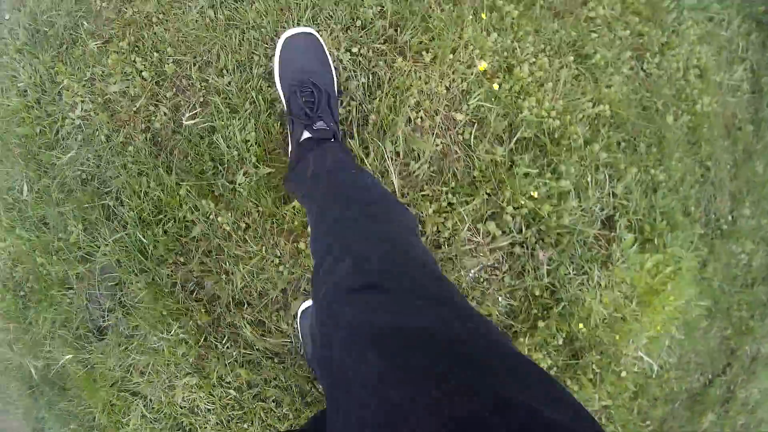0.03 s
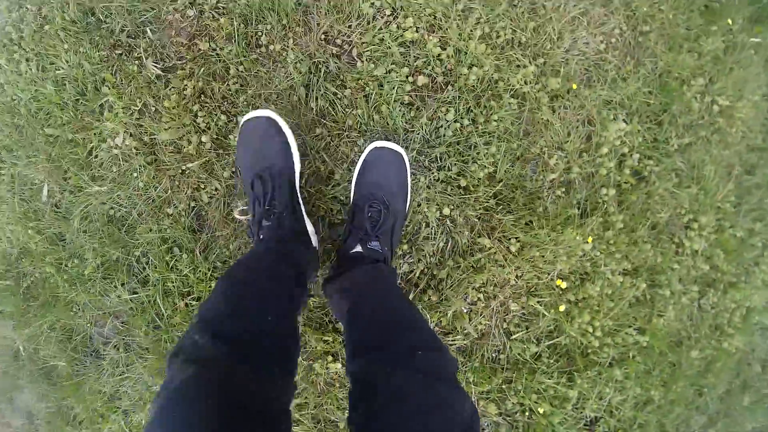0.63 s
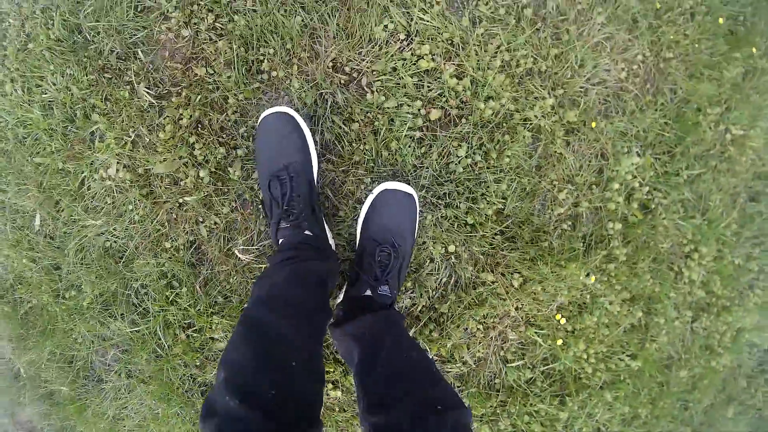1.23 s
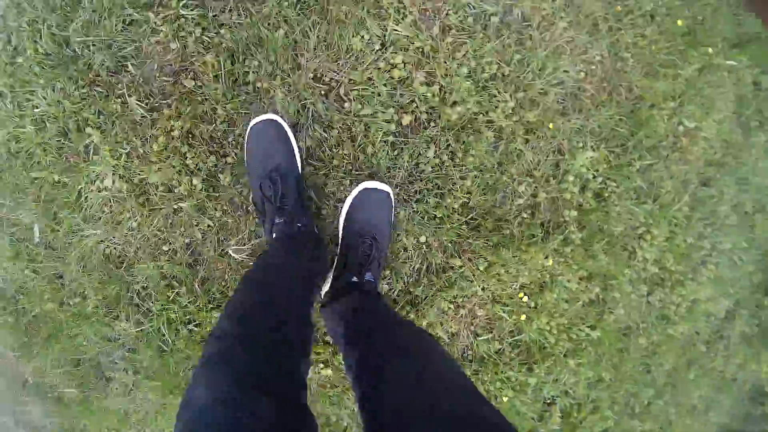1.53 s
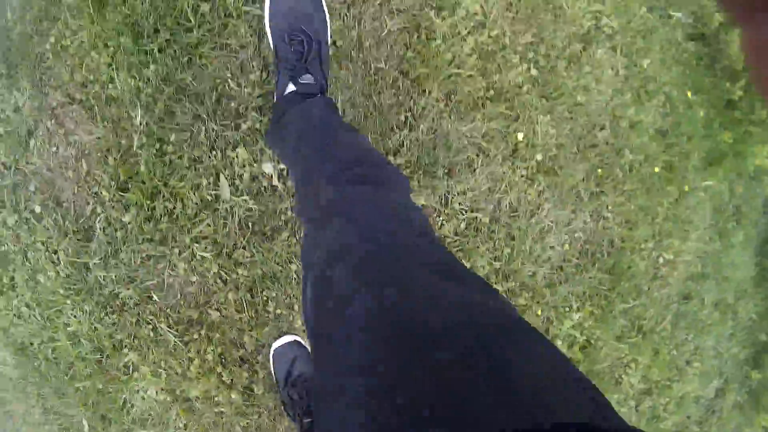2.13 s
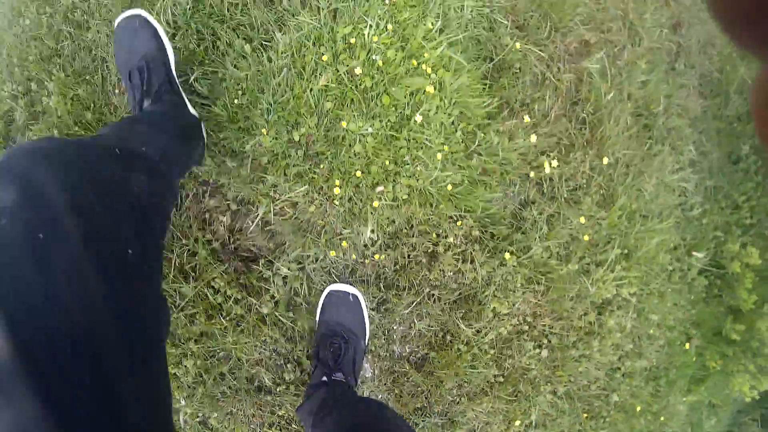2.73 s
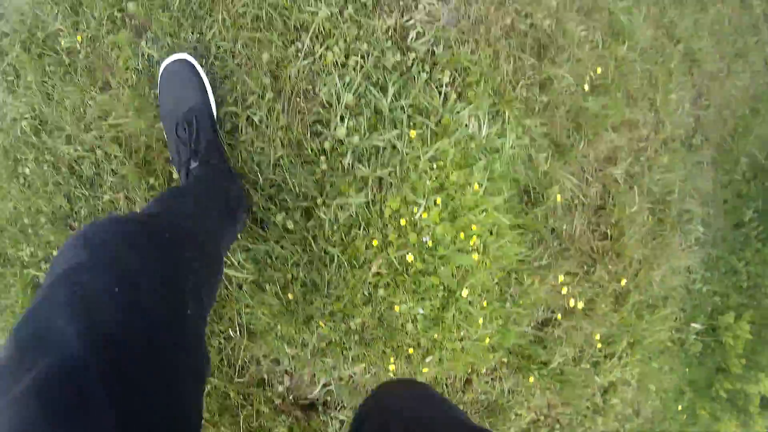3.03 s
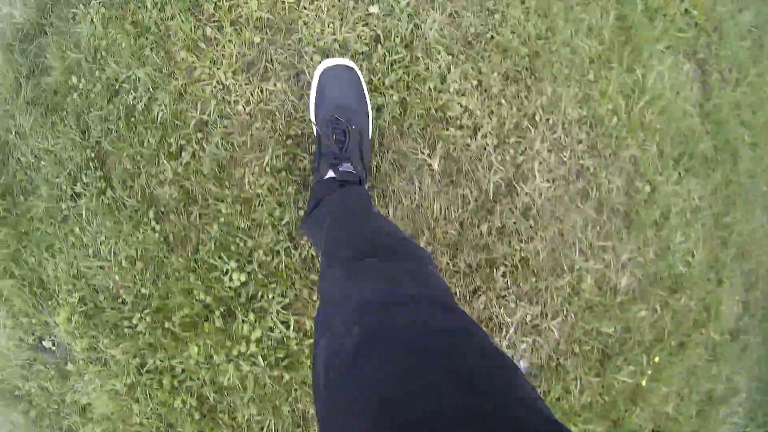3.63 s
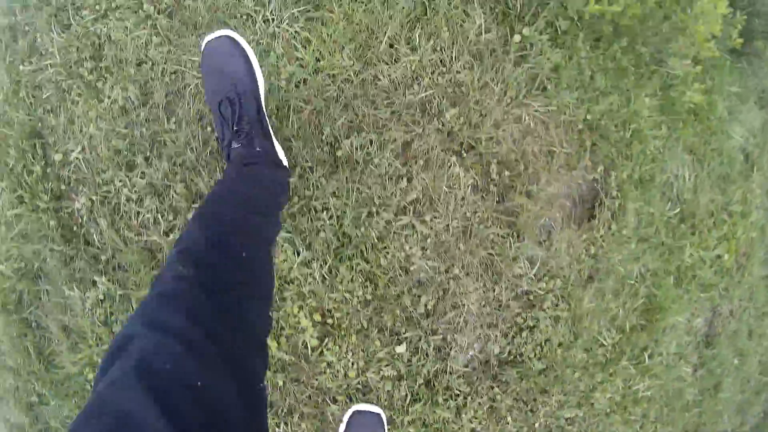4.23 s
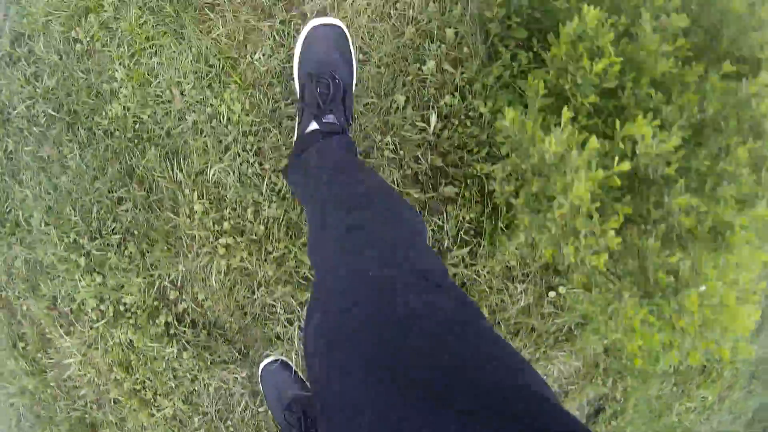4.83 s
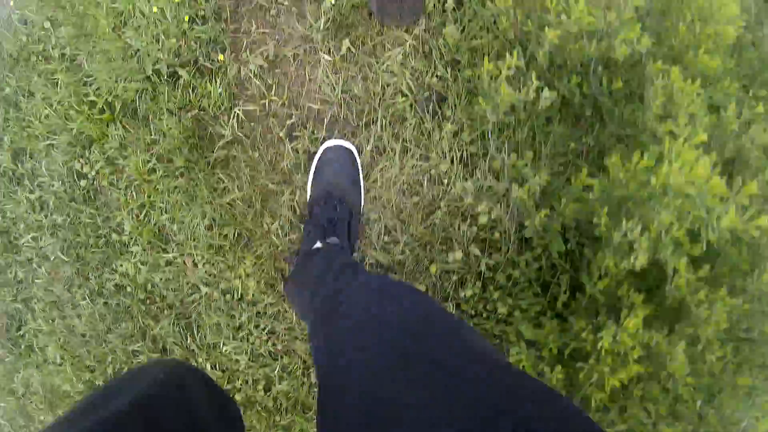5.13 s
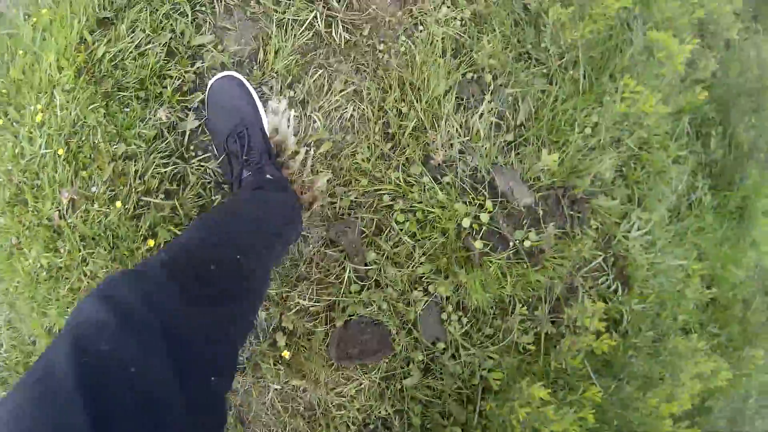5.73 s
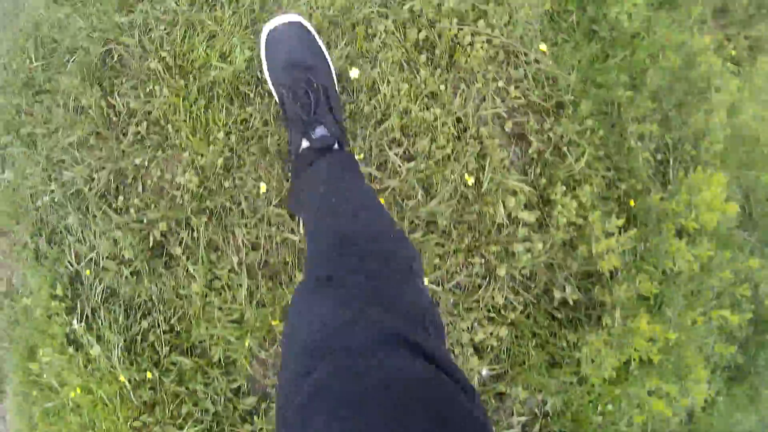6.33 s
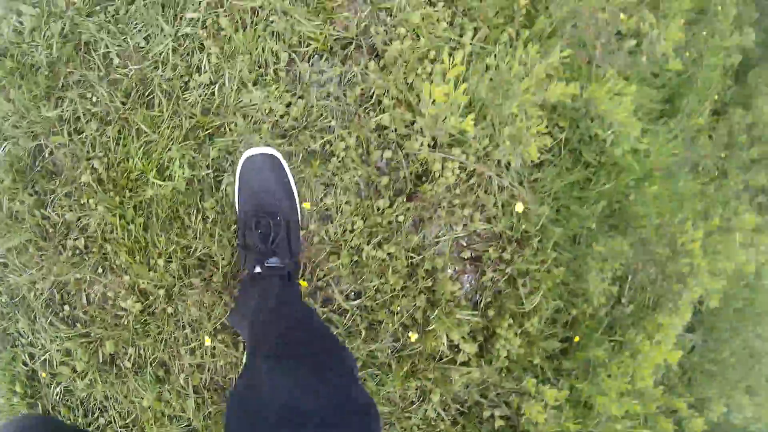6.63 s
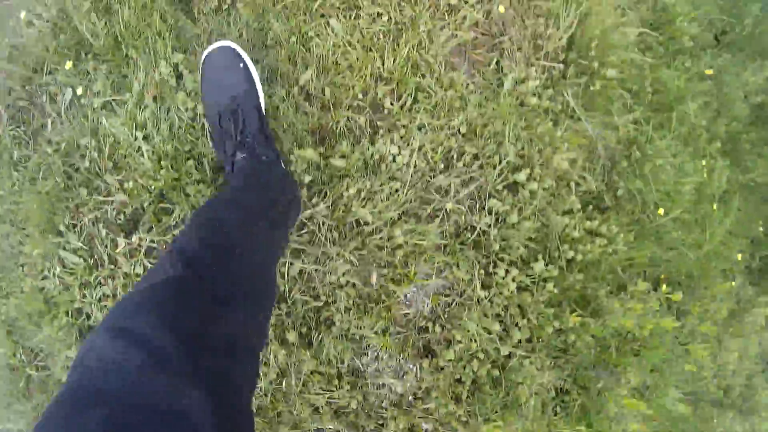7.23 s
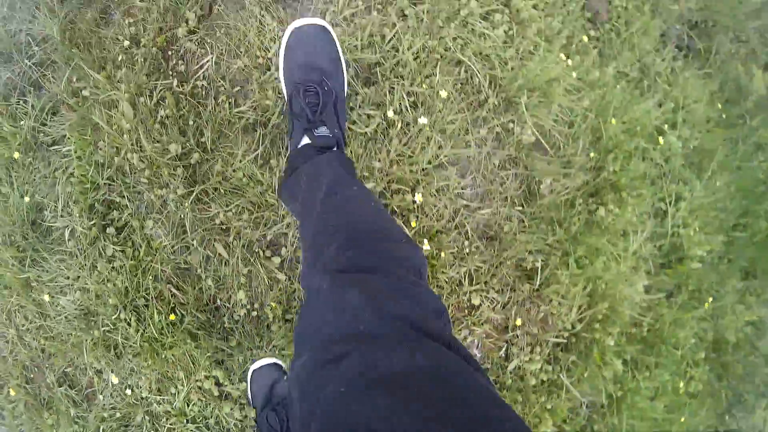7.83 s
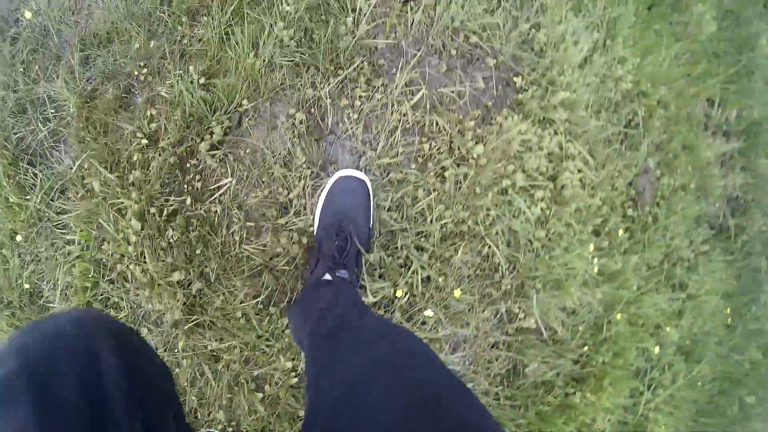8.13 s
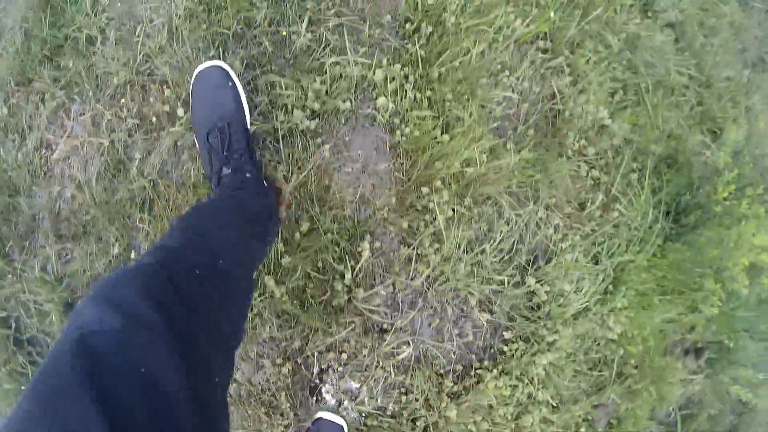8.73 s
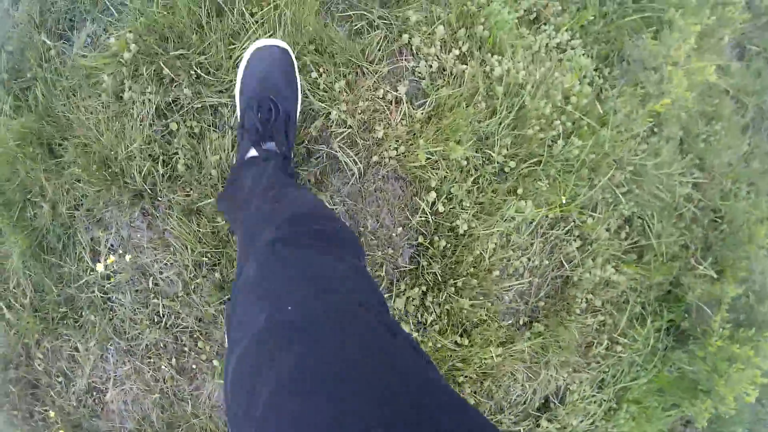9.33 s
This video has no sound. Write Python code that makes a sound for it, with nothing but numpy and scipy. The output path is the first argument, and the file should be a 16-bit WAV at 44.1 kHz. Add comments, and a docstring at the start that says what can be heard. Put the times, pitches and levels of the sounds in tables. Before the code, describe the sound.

Fingers rub and creak on a hand-held camera's casing in close, damp, rubbery bursts, then settle, leaving faint ticks and low outdoor rumble.

```python
"""A walk over damp grass, heard from a small hand-held camera. From the start, a low outdoor rumble and
an electronic hiss that comes once a second lie under a close, damp, rubbery rubbing, most likely fingers
on the casing. For about four seconds they stick and slip in creaks and snaps, slide smoothly in between
and give a few soft thuds. Then the hand settles with one last hollow rub. Once the grip rests, only
faint ticks and soft thuds are left over the rumble and hiss."""
import sys
import numpy as np
from scipy import signal
from scipy.fft import rfft, irfft, next_fast_len
from scipy.io import wavfile

SR = 44100
rng = np.random.default_rng(int(sys.argv[2]) if len(sys.argv) > 2 else 0)


def master(y):
    """Save y as 16-bit WAV."""
    cut = np.clip(np.atleast_2d(y).T, -1, 1)
    pcm = np.round(cut * 32767)  # scale
    wavfile.write(sys.argv[1], SR, pcm.astype(np.int16))


N = 414099
TIME = np.arange(N) / SR
FREQS = np.maximum(np.fft.rfftfreq(2 * next_fast_len(N // 2 + SR // 4), 1 / SR), 1)
SLIP_SAMPLES = SR // 60

# Levels in a table compare its rows; the functions set the final loudness.
# tone of the outdoor rumble and microphone hiss: frequency_hz, level_db
BACKGROUND_TONE = [(12, 0), (22, -2.5), (45, -4), (90, -5.5), (160, -9), (300, -12.5), (600, -18.5),
                   (1200, -23.5), (2500, -26), (8000, -28.5), (14000, -28), (16000, -32.5)]
# soft thuds of the hand and the stride: time_s, level_db, pitch_hz
SOFT_THUDS = [(0.597, -37, 85), (0.596, -36, 203), (1.833, -45, 170.1), (1.833, -30.5, 333),
              (2.252, -45, 139.6), (4.381, -55, 380), (6.129, -53.5, 368), (6.319, -52, 340),
              (6.400, -55, 420), (6.696, -49.5, 380)]
# faint ticks of the casing: time_s, level_db
CASING_TICKS = [(4.72, -53.5), (6.092, -58), (6.319, -67), (6.4, -64), (6.59, -63), (6.696, -61),
                (7.632, -59), (9.196, -52)]
# hollow rubs as the hand settles: peak_s, rise_s, fall_s, level_db
SETTLING_RUBS = [(3.741, 0.04, 0.12, -56), (3.9, 0.028, 0.075, -60), (4.071, 0.15, 0.092, -65.5)]
# how well the casing carries low and high sounds: frequency_hz, gain_db
CASING_TONE = [(30, -12.5), (100, -4.5), (260, -5), (400, -1), (850, -6), (1400, -6.5), (2000, -11),
               (2600, -22), (4500, -25.5), (5300, -38), (8500, -45), (11200, -42.5), (15000, -59.5)]
# narrow bands where the casing rings (+) or sounds hollow (-): frequency_hz, width_hz, gain_db
CASING_RESONANCES = [(399, 100, 2.5), (507, 77, 8), (561, 59, -8.5), (639.7, 54, 6.5), (840, 35, 3),
                     (870, 52, -9), (1000, 32, 3), (1127, 76, 2), (1200, 90, 1), (1568, 190, 4.5),
                     (1885, 92, -8.5), (1963, 190, 6), (2970, 240, 3.5), (3330, 130, 6.5), (3440, 290, -7),
                     (3890, 410, 4), (4450, 400, 1), (5150, 610, 0)]
# tone of smooth sliding, before the casing shapes it: frequency_hz, level_db
SLIDE_TONE = [(60, -1.5), (250, -3.5), (500, -6.5), (750, -10), (1080, 6.5), (1350, -19), (1650, 4.5),
              (2200, -0.5), (3200, 9), (4500, 3.5), (5500, 10), (7000, 10), (11000, 4)]
# smooth slides that swell and die away: peak_s, rise_s, fall_s, level_db, squeal_hz, squeal_db
SMOOTH_SLIDES = [(0.131, 0.02, 0.082, -51.5, 1603, -7), (0.47, 0.13, 0.16, -50.5, 1500, -9),
                 (1.32, 0.1, 0.053, -54, 1250, 7), (1.46, 0.05, 0.21, -47.5, 1145, -8),
                 (1.67, 0.06, 0.15, -53, 1310, 4), (1.82, 0.03, 0.02, -57, 1450, -1),
                 (1.959, 0.07, 0.023, -51, 1660, -9), (2.16, 0.22, 0.22, -62.5, 1525, -27),
                 (2.548, 0.05, 0.04, -41, 1294, 5.5), (2.759, 0.07, 0.16, -39, 1145, -6.5),
                 (2.829, 0.05, 0.069, -43, 1153, -7.5), (3.0, 0.06, 0.044, -53, 1294, -1),
                 (3.111, 0.06, 0.16, -46, 1562, -1.5), (3.19, 0.035, 0.03484, -39, 1145, -1.5),
                 (3.221, 0.04, 0.2, -47.5, 1615, -5.5), (3.389, 0.11, 0.077, -45, 1080, -5.5),
                 (3.605, 0.085, 0.088, -38, 1300, 0.5)]
# single snaps, where the grip lets go all at once: time_s, level_db, thud_db, crack_db, ring_hz
GRIP_SNAPS = [(0.0444, -54, 23.5, 7, 1280), (0.245, -34, -11, -5, 1320), (0.499, -25, 0.5, -3, 1380),
              (0.5255, -21, -9, -6, 1430), (0.5375, -24.5, -6.5, -9, 1500), (0.5643, -38.5, 6, 5, 1700),
              (0.576, -26, -2, -9, 1770), (0.5938, -20, -10, -9.5, 1780), (0.7407, -56.5, 2, -5, 1800),
              (0.9326, -54.5, 7, -24, 1600), (1.3443, -29.5, 9.5, 5, 1330), (1.38, -30, 5.5, 5.5, 1340),
              (1.726, -29, -3, -2, 1330), (1.83, -28.5, -13.5, -1, 1180), (1.9579, -41.5, -13, 2, 1000),
              (1.9877, -45, -6.5, 10, 1030), (2.079, -52.5, 6.5, 0, 1100), (2.3341, -56, 5.5, -10, 1280),
              (2.656, -20.5, 0, -5, 1300), (3.0759, -34, -4.5, -4, 1367), (3.4009, -29.5, -9, -12, 1200),
              (3.605, -18, -2.5, -9, 1487)]
# creaks, each a run of sticking and slipping: start_s, end_s, first_slips_per_s, last_slips_per_s,
# start_level_db, middle_level_db, end_level_db, thud_db, crack_db, ring_hz
CREAK_RUNS = [(0.0677, 0.101, 77.1, 149.3, -41.5, -42, -39, 5, 7, 1300),
              (0.111, 0.127, 110, 195, -41.5, -44, -46, 10.5, 10.5, 1300),
              (0.1798, 0.198, 155, 132, -41.5, -44, -44, 6.5, 3, 1300),
              (0.2563, 0.3, 52, 111, -39, -51, -55, 0.5, -8, 1350),
              (0.33, 0.383, 79, 77.4, -58, -59, -42.5, 4.5, -6.5, 1350),
              (0.39, 0.477, 219.2, 300, -39, -36.5, -29, -2, -9.5, 1280),
              (0.481, 0.523, 166, 119.4, -30.5, -36, -30, -3, -7, 1320),
              (0.6213, 0.668, 42, 70, -40.5, -50, -44.5, -3, -14, 1850),
              (1.159, 1.197, 63, 113.5, -43, -43.5, -37, 0, 0, 1400),
              (1.204, 1.266, 149, 167.6, -36.5, -34.5, -39.5, 4.5, -6, 1300),
              (1.279, 1.34, 108, 126.4, -31, -27.5, -28.5, 2.5, -4, 1320),
              (1.3525, 1.406, 154, 108.6, -36, -42, -40.5, 3, -4, 1330),
              (1.4118, 1.448, 81.7, 104.6, -30, -24, -23.5, 0.5, -4.5, 1350),
              (1.458, 1.602, 140, 124.5, -52.5, -41.5, -50, 2, -14, 1200),
              (1.612, 1.672, 166, 168.8, -43.5, -34.5, -30, 2, -3, 1400),
              (1.6776, 1.7, 87.6, 124.2, -25, -27, -30, 1.5, -1.5, 1380),
              (1.706, 1.816, 102, 104.4, -38, -48.5, -54, 5, -2, 1300),
              (1.849, 1.927, 89, 100.3, -51.5, -57, -51.5, 6, -5.5, 950),
              (2.4964, 2.591, 93.6, 104.8, -30, -29, -22, -1.5, -5, 1490),
              (2.606, 2.688, 102, 100.9, -25, -25, -21.5, 2, -2, 1350),
              (2.696, 2.738, 74, 89.8, -28.5, -28.5, -27.5, 4.5, -1, 1300),
              (2.74, 2.807, 265, 190.6, -37, -40.5, -39, 5, -2.5, 1200),
              (2.9412, 3, 132, 113.6, -42.5, -43, -39, 3, 4.5, 1450),
              (3.338, 3.418, 190, 179.9, -46.5, -40, -38, 2.5, -5, 1200),
              (3.422, 3.469, 145, 156, -46.5, -43.5, -45, 3, 1, 1250),
              (3.4695, 3.546, 109, 78.2, -40.5, -38, -38, 4.5, 1, 1400),
              (3.552, 3.595, 118.3, 116.3, -25.5, -26.5, -22.5, -6, -5.5, 1400),
              (3.6177, 3.703, 108.1, 131, -23.5, -25, -30.5, -0.5, -2, 1470),
              (3.729, 3.798, 102, 105, -58, -44, -57, -3, -4, 1400),
              (3.803, 3.852, 60, 84.7, -54.5, -54.5, -68, 5, -12, 1290),
              (3.878, 3.934, 100.3, 85, -60.5, -58.5, -66, 4, -4, 1310)]


def from_db(db):
    """Turn decibels into a number to multiply by."""
    return 10 ** (np.asarray(db) / 20)


def unit_power(x):
    """Scale a signal so that its average power is 1."""
    return x / np.sqrt(np.mean(x ** 2) + 1e-20)


def tone_curve(points):
    """Join a table's points into a level in dB for every frequency."""
    hz, db = np.transpose(points)
    return np.interp(np.log(FREQS), np.log(hz), db)


def shape_tone(x, curve_db):
    """Give a sound this tone; nothing rings before its cause (a minimum-phase filter)."""
    cepstrum = irfft(np.log(unit_power(from_db(curve_db))))
    half = len(cepstrum) // 2
    folded = np.concatenate([cepstrum[:1], 2 * cepstrum[1:half]])   # moves early ringing to afterwards
    return irfft(rfft(x, 2 * half) * np.exp(rfft(folded, 2 * half)))[:N]


def low_pass(x, hz, order=2):
    """Keep what lies below hz."""
    return signal.sosfilt(signal.butter(order, hz, fs=SR, output="sos"), x + 1e-18)


def soften(x, hz):
    """Dull the treble with two gentle low-pass filters."""
    r = np.exp(-2 * np.pi * hz / SR)
    return signal.lfilter([(1 - r) ** 2], [1, -2 * r, r * r], x)


def boost_band(x, hz, gain_db, q):
    """Turn the band around hz up or down; a larger q makes it narrower."""
    angle, gain = 2 * np.pi * min(hz, SR / 3) / SR, from_db(gain_db / 2)
    width, centre = np.sin(angle) / (2 * q), -2 * np.cos(angle)
    zeros = [1 + width * gain, centre, 1 - width * gain]
    poles = [1 + width / gain, centre, 1 - width / gain]
    return signal.lfilter(zeros, poles, x)


def drift(hz):
    """A random wobble, about 1 in size and mostly slower than hz."""
    return unit_power(low_pass(rng.standard_normal(N + SR), hz)[SR:])


def add(out, time_s, sound):
    """Mix a short sound in at the given time."""
    start = int(np.clip(round(time_s * SR), 0, N - 1))
    out[start:start + len(sound)] += sound[:N - start]


def background(level_db=-64.5, rumble_top_hz=250, waver_db=1.7, waver_hz=6):
    """Low outdoor rumble, wavering a little, under an even hiss."""
    steady = from_db(level_db) * shape_tone(rng.standard_normal(N), tone_curve(BACKGROUND_TONE))
    rumble = low_pass(steady, rumble_top_hz, order=1)
    waver = from_db(waver_db * drift(waver_hz)) - 1
    return steady + rumble * waver


def electronics(first_s=0.16, length_s=0.28, hiss_db=-68, whine_hz=9519):
    """Extra hiss switches on once a second; a very thin whine gets fainter behind it."""
    since_s = (TIME - first_s) % 1
    switch = np.clip(np.minimum(since_s, length_s - since_s) * 200, 0, 1)   # 5 ms fades
    hiss = from_db(hiss_db) * switch * rng.standard_normal(N)
    whine_db = np.interp(TIME, [3.5, 6], [-90.5, -94])
    return hiss + from_db(whine_db) * np.sqrt(2) * np.sin(2 * np.pi * whine_hz * TIME)


def knock(hz, cycles):
    """A short ring that dies away by 60 dB in this many cycles."""
    t = TIME[:SR // 10]
    return np.sin(2 * np.pi * hz * t) * from_db(-60 * hz * t / cycles)


def thuds_and_ticks(thud_gain_db=2, tick_gain_db=1):
    """Hand and stride give dull thuds, and the casing ticks as it is carried along."""
    out = np.zeros(N)
    for time_s, level_db, pitch_hz in SOFT_THUDS:
        add(out, time_s, from_db(level_db + thud_gain_db) * knock(pitch_hz, cycles=6))
    for time_s, level_db in CASING_TICKS:
        add(out, time_s, from_db(level_db + tick_gain_db) * knock(hz=1150, cycles=13))
    return out


def rubbed_ring(hz, width_hz):
    """A rough note kept ringing by rubbing; its pitch may move."""
    phase = 2 * np.pi * np.cumsum(hz * np.ones(N)) / SR
    return drift(width_hz / 2) * np.cos(phase) + drift(width_hz / 2) * np.sin(phase)


def swell(peak_s, rise_s, fall_s, level_db, drop_db=19.5, roundness=1.3):
    """Loudness of one rub: drop_db below its peak at rise_s before it and fall_s after it."""
    away = np.maximum((peak_s - TIME) / rise_s, (TIME - peak_s) / fall_s)
    gain, near = np.zeros(N), away < 4
    gain[near] = from_db(level_db - drop_db * np.abs(away[near]) ** roundness)
    return gain


def settling_hand():
    """A slow, light rub wakes only the lowest ring of the casing."""
    return sum(swell(*rub) for rub in SETTLING_RUBS) * rubbed_ring(hz=450, width_hz=130)


def casing(force):
    """The casing carries the rubbing to the microphone; it bends, spreading each snap over a few cycles."""
    resonances_db = sum(db / (1 + (2 * (FREQS - hz) / width_hz) ** 2)
                        for hz, width_hz, db in CASING_RESONANCES)
    for hz, width_hz in [(1200, 1300), (2100, 800)]:   # these bands come late but no quieter
        r = np.exp(-np.pi * width_hz / SR)
        poles = [1, -2 * r * np.cos(2 * np.pi * hz / SR), r * r]
        force = signal.lfilter(poles[::-1], poles, force)
    return shape_tone(force, tone_curve(CASING_TONE) + resonances_db)


def slides(gain_db=6, squeal_gain_db=-13, grain_db=2, waver_db=0.7):
    """Under a light grip, tiny slips blur into a grainy swish; the loudest slide squeals faintly."""
    swells = np.array([swell(*shape) for *shape, _, _ in SMOOTH_SLIDES])
    *_, squeal_hz, squeal_db = np.transpose(SMOOTH_SLIDES)
    loudest = swells.argmax(axis=0)   # chosen moment by moment
    swish = shape_tone(rng.standard_normal(N), tone_curve(SLIDE_TONE))
    squeal = from_db(squeal_db + squeal_gain_db)[loudest] * rubbed_ring(squeal_hz[loudest], width_hz=240)
    grain = unit_power(from_db(grain_db * drift(hz=600) + waver_db * drift(hz=40)))
    return (swish + squeal) * grain * from_db(gain_db) * np.linalg.norm(swells, axis=0)


def pressure(level_db, light_db=-46.5, hard_db=-28.5):
    """How hard the finger presses for a slip of this level, from 0 to 1."""
    return np.clip((level_db - light_db) / (hard_db - light_db), 0, 1)


def slip(noise, ring_hz, thud_db, crack_db, chatter=1, chatter_s=0.0012):
    """One slip: a soft snap, a burst of chatter as the finger grips again, and the touched spot's ring."""
    t = TIME[:SLIP_SAMPLES]
    snap = soften(1.0 * (t == 0), hz=2800)
    burst = noise * np.sqrt(t / chatter_s) * np.exp(-t / chatter_s)
    burst = burst - soften(burst, hz=440)   # chatter goes to and fro, so it has little bass
    force = snap + chatter * burst / np.linalg.norm(burst)
    force = boost_band(force, ring_hz * np.exp(0.11 * noise[0]), gain_db=7, q=1.9)
    force = force / np.linalg.norm(soften(force, hz=3000))   # same energy below the treble
    force = boost_band(force, hz=4000, gain_db=crack_db, q=0.9)
    return boost_band(force, hz=310, gain_db=thud_db, q=0.42)


def snaps(gain_db=11, creep_db=-13, creep_s=0.0018, zing_db=3):
    """Single loud cracks: the finger creeps a little, lets go, and gives a tiny high zing."""
    out, zing = np.zeros(N), knock(hz=11000, cycles=14)
    for time_s, level_db, thud_db, crack_db, ring_hz in GRIP_SNAPS:
        creep_noise, release_noise = rng.standard_normal((2, SLIP_SAMPLES))
        creep = slip(creep_noise, ring_hz, thud_db - 1, crack_db)
        release = slip(release_noise, ring_hz, thud_db - 1, crack_db + 3, chatter=0.63)
        size = from_db(level_db + gain_db)
        add(out, time_s - creep_s, size * pressure(level_db) * from_db(creep_db) * creep)
        add(out, time_s, size * release)
        add(out, time_s + 0.001, from_db(level_db + zing_db) * zing)
    return out


def creaks(gain_db=10, creep_db=-8.5, creep_s=0.002263, after_db=-13, zing_db=6, max_slips=32):
    """Slips come in quick, almost even runs; pressed hard, each creeps first and slips again after."""
    out, zing = np.zeros(N), knock(hz=11000, cycles=12)[:SLIP_SAMPLES]
    for start_s, end_s, first_per_s, last_per_s, *levels_db, thud_db, crack_db, ring_hz in CREAK_RUNS:
        chances = rng.standard_normal((max_slips, 3))   # no two slips have quite the same timing or level
        noises = rng.standard_normal((max_slips, 3, SLIP_SAMPLES))
        due_s = start_s
        for (late, strong, lag), (creep_noise, release_noise, after_noise) in zip(chances, noises):
            if due_s > end_s:
                break
            gap_s = 1 / np.interp(due_s, [start_s, end_s], [first_per_s, last_per_s])
            level_db = np.interp(due_s, [start_s, (start_s + end_s) / 2, end_s], levels_db) + 1.8 * strong
            time_s = due_s + 0.06 * late * gap_s
            after_s = time_s + 0.38 * np.exp(0.3 * lag) * gap_s
            size, press = from_db(level_db + gain_db), pressure(level_db)
            chatter = np.interp(press, [0, 1], [0.4, 0.7])   # pressing harder makes it rougher
            creep = slip(creep_noise, ring_hz, thud_db, crack_db)
            release = slip(release_noise, ring_hz, thud_db - 0.5, crack_db + 6, chatter)
            after = slip(after_noise, ring_hz, thud_db, crack_db)
            add(out, time_s - creep_s, size * press * from_db(creep_db) * creep)
            add(out, time_s, size * release)
            add(out, time_s + 0.001, from_db(level_db + zing_db) * zing)
            add(out, after_s, size * press * from_db(after_db) * after)
            due_s += gap_s
    return out


def scene():
    """Rubbing heard through the casing, over the quiet of the meadow."""
    quiet = background() + electronics() + thuds_and_ticks() + settling_hand()
    rubbing = casing(slides() + snaps() + creaks())
    return (quiet + rubbing)[None]


def record(dry):
    """Cut the highest treble away steeply."""
    cutoff_hz = 15750
    return signal.sosfilt(signal.ellip(12, 0.1, 70, cutoff_hz, fs=SR, output="sos"), dry)


dry = scene()
out = record(dry)
master(out)
```